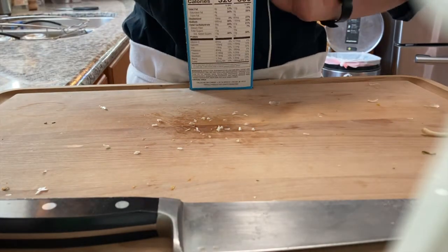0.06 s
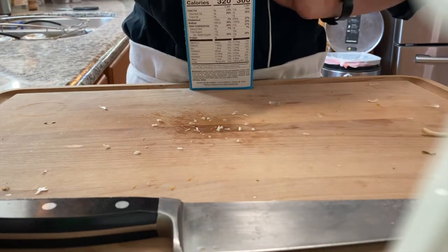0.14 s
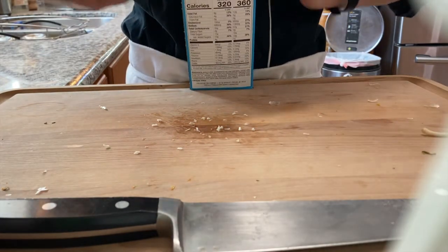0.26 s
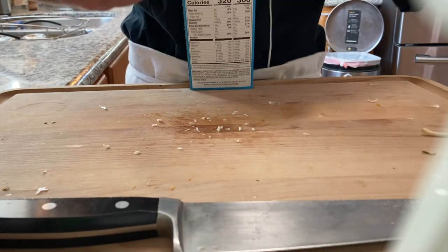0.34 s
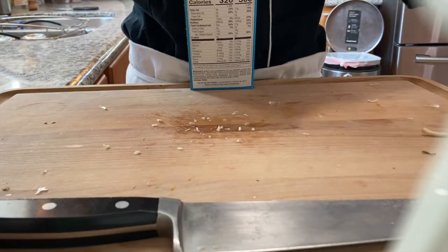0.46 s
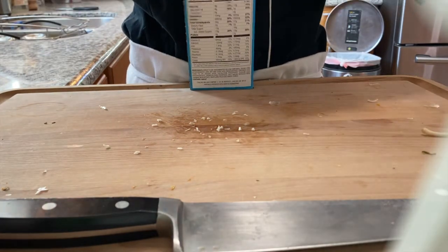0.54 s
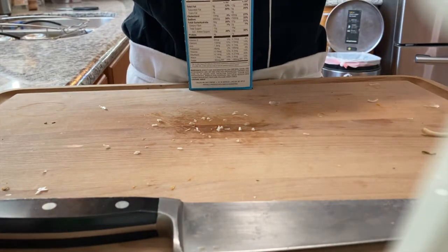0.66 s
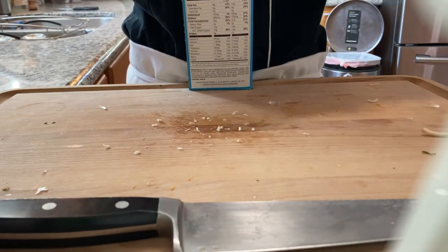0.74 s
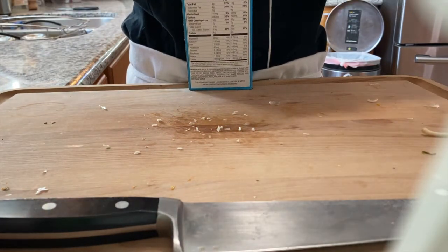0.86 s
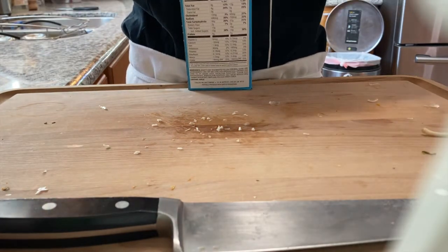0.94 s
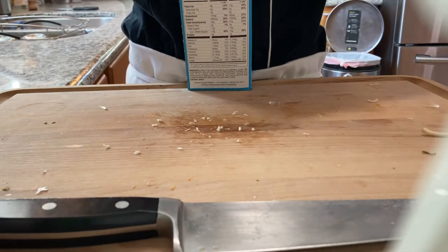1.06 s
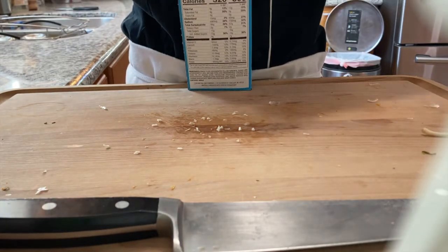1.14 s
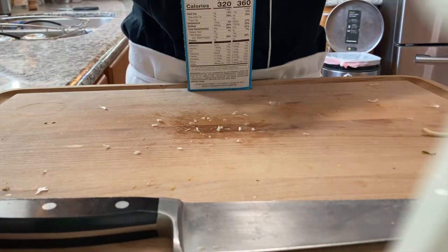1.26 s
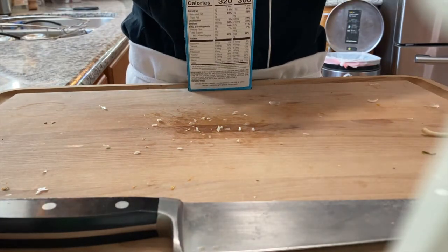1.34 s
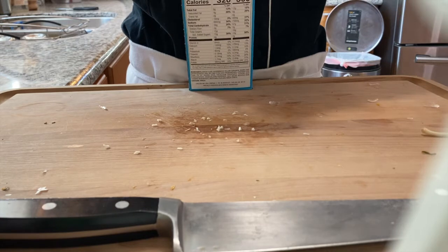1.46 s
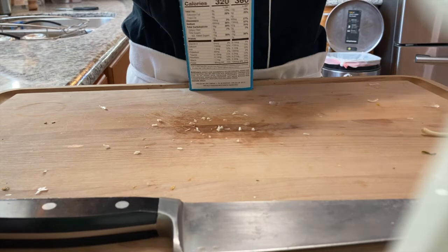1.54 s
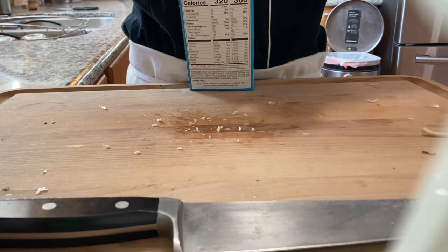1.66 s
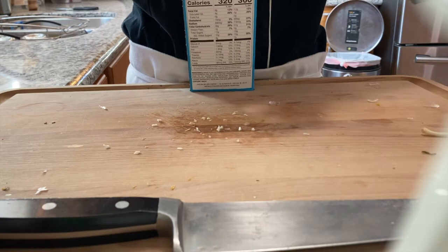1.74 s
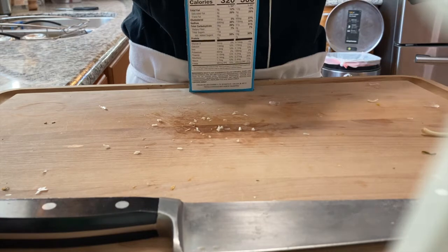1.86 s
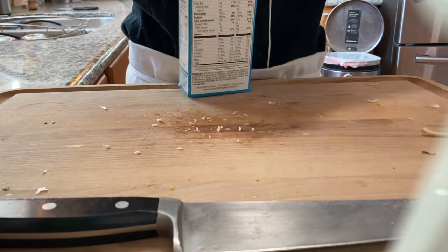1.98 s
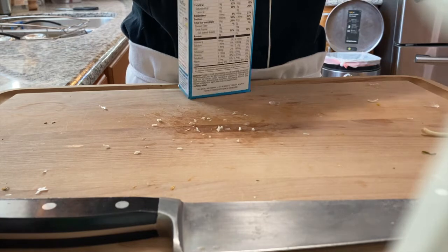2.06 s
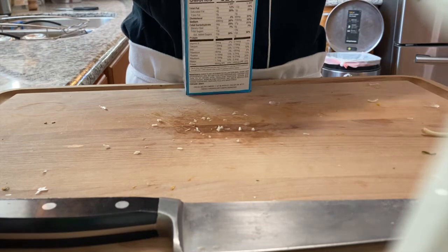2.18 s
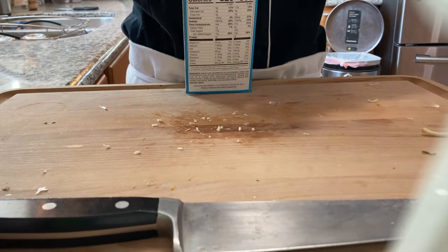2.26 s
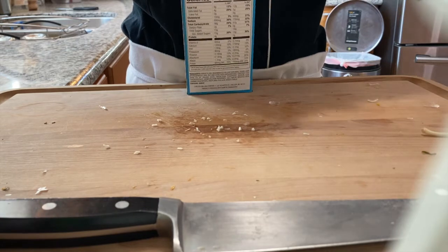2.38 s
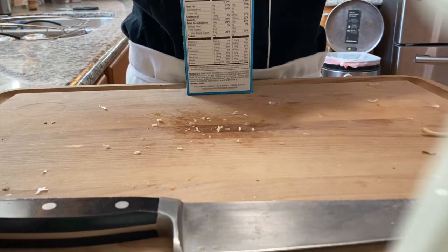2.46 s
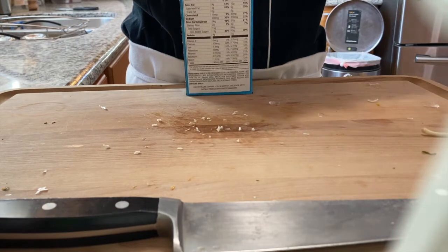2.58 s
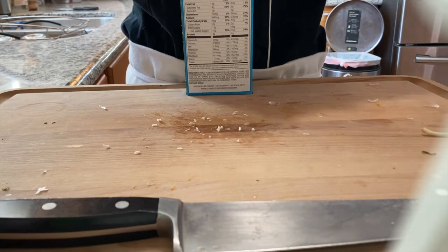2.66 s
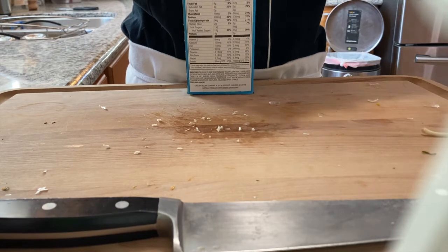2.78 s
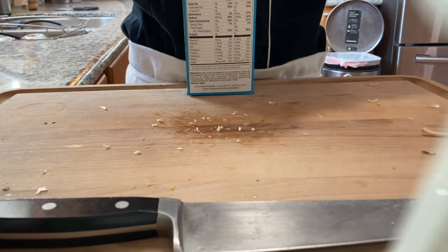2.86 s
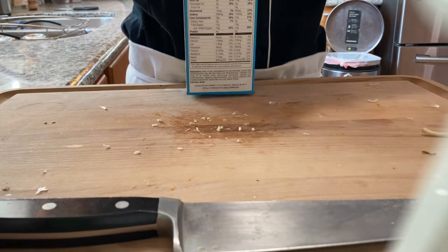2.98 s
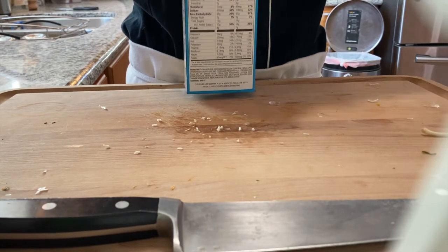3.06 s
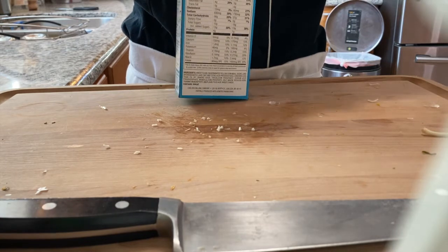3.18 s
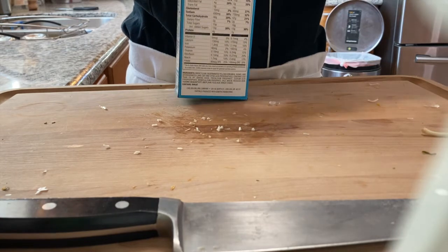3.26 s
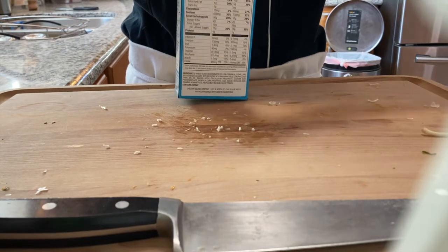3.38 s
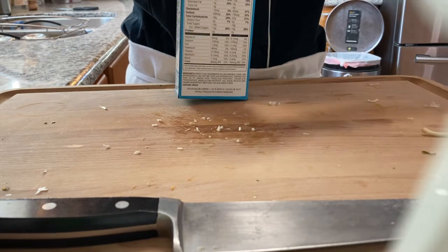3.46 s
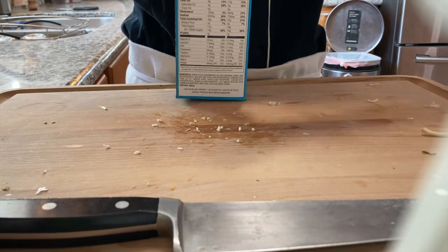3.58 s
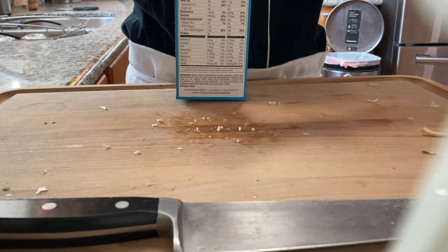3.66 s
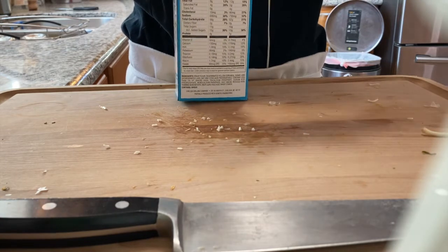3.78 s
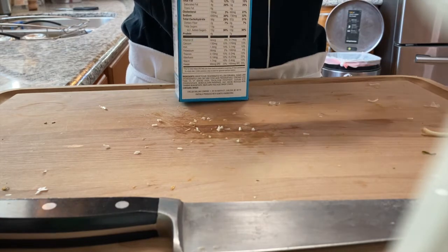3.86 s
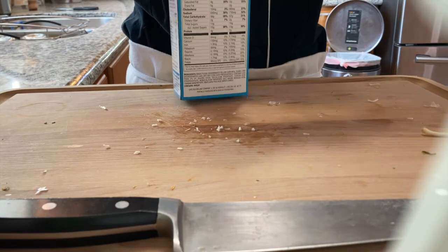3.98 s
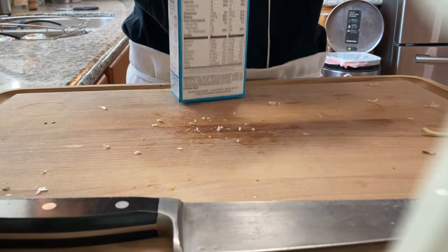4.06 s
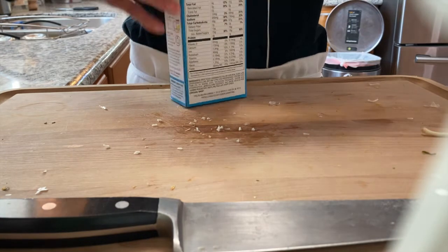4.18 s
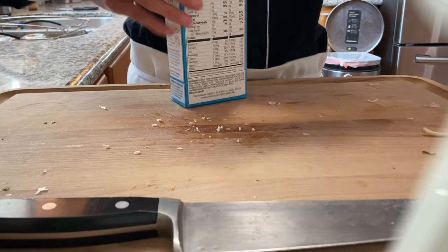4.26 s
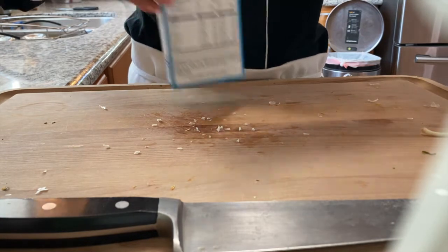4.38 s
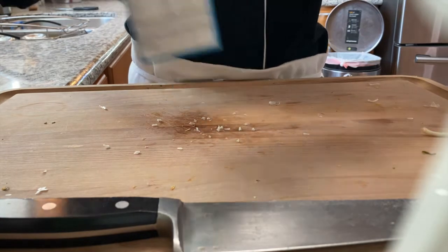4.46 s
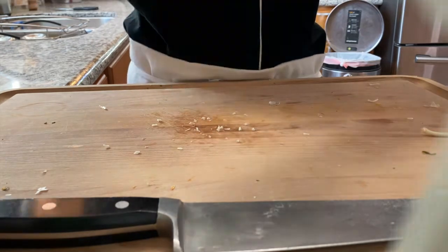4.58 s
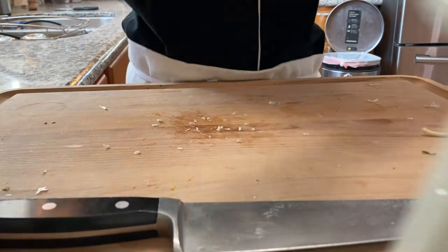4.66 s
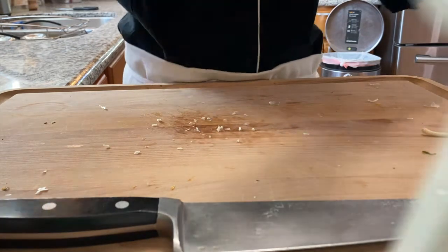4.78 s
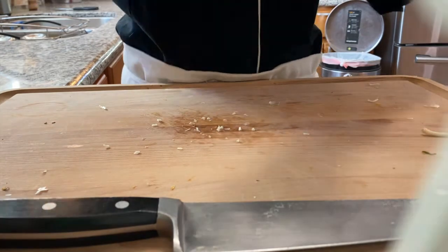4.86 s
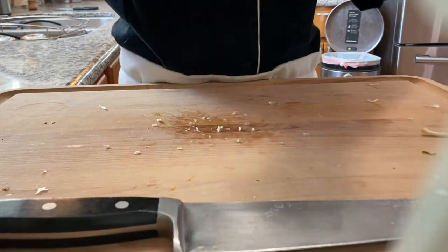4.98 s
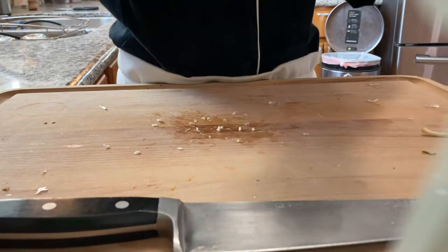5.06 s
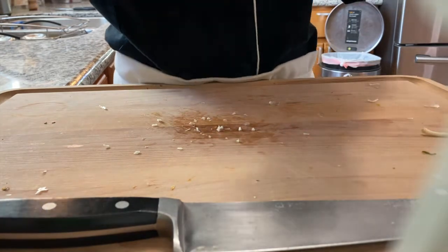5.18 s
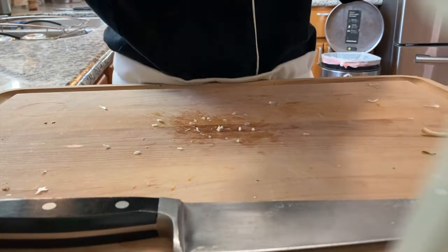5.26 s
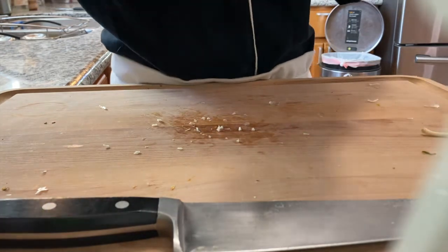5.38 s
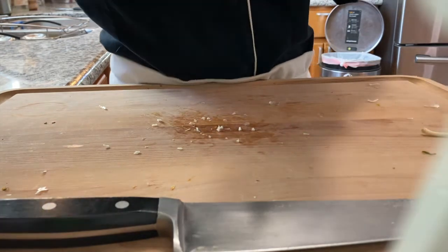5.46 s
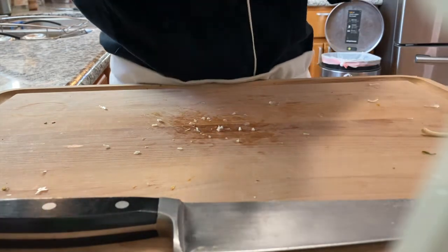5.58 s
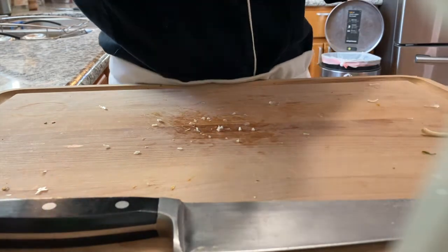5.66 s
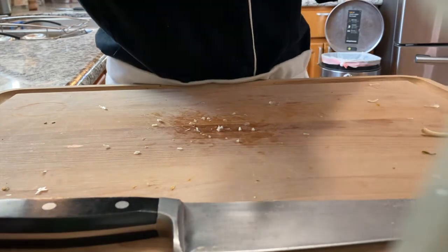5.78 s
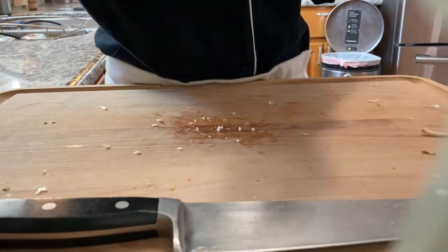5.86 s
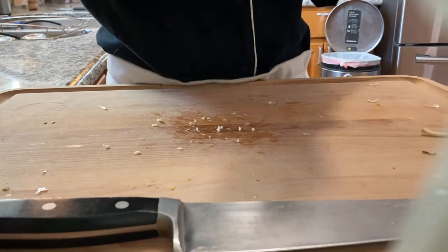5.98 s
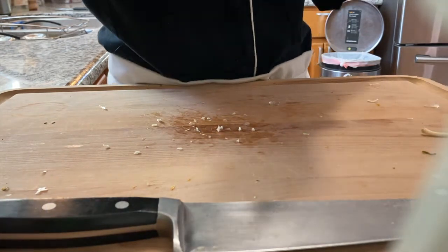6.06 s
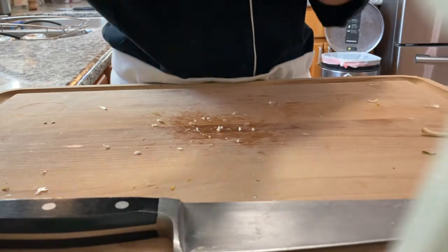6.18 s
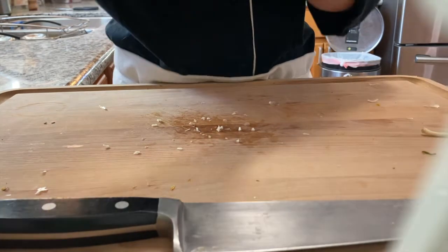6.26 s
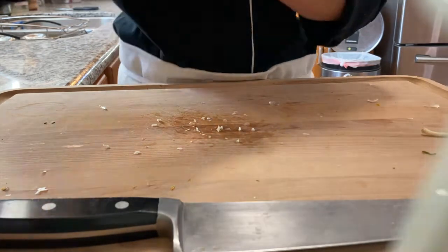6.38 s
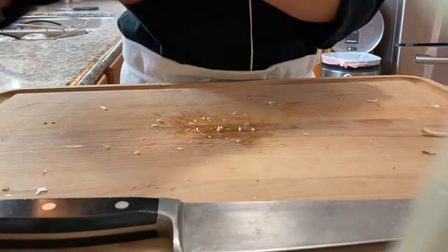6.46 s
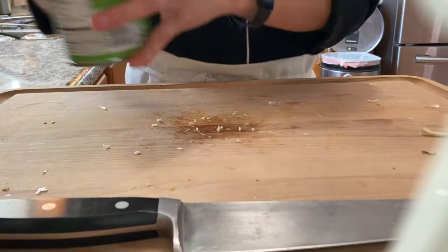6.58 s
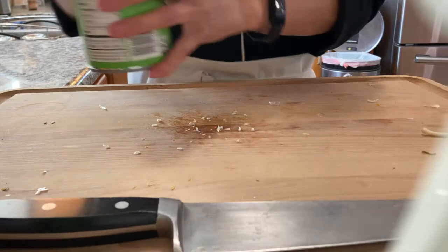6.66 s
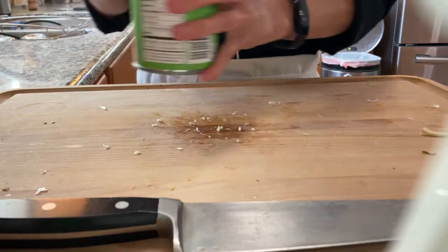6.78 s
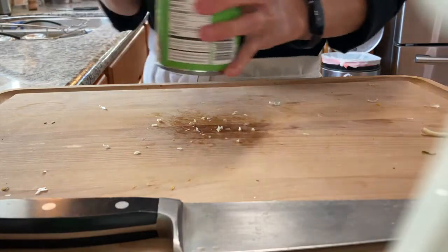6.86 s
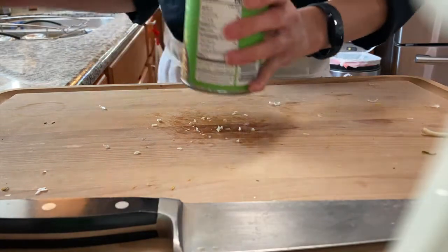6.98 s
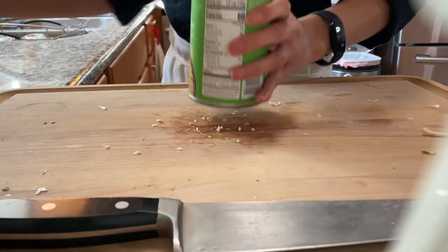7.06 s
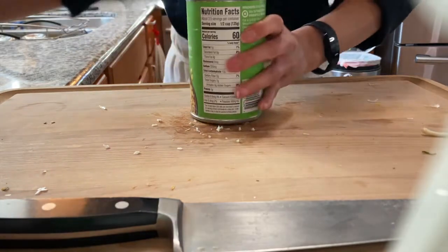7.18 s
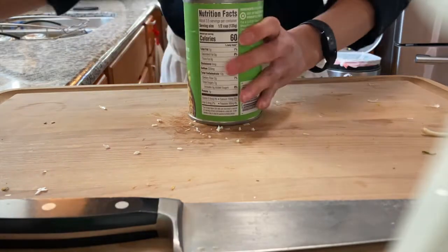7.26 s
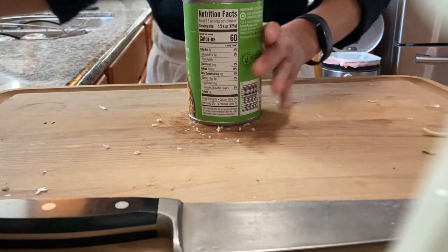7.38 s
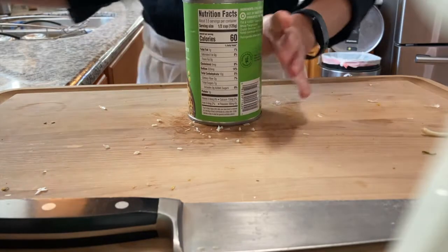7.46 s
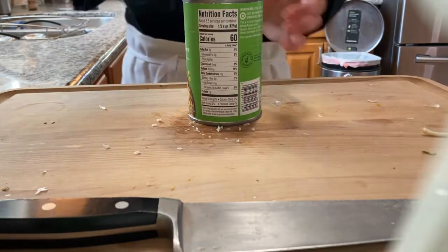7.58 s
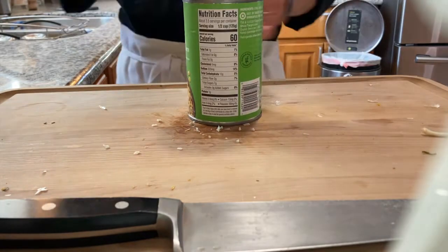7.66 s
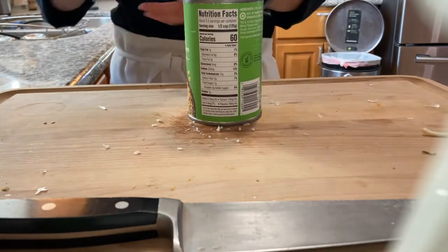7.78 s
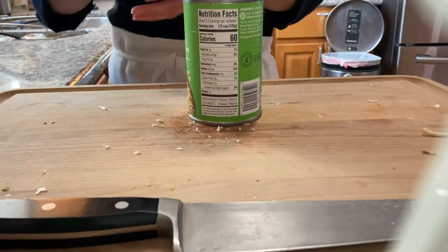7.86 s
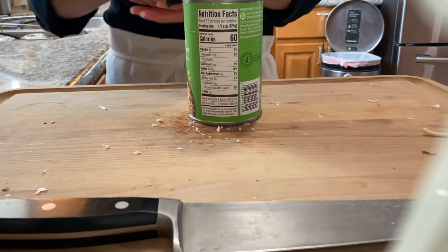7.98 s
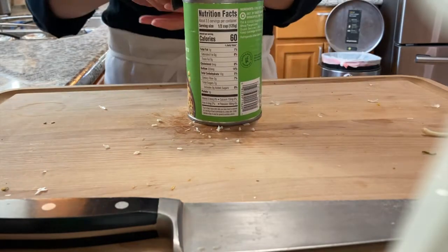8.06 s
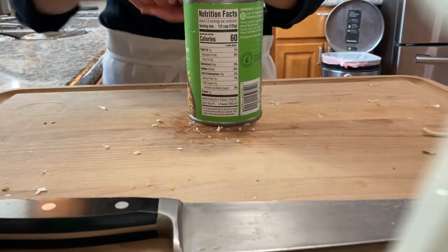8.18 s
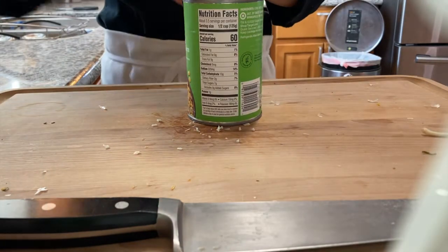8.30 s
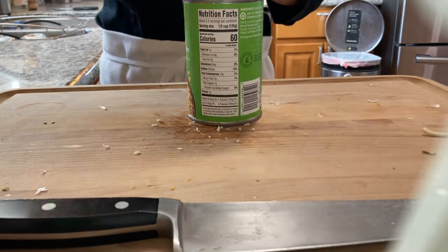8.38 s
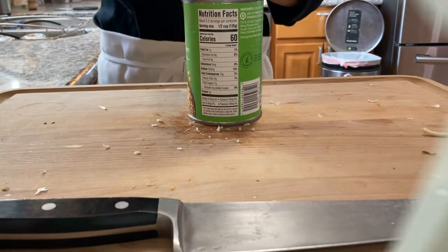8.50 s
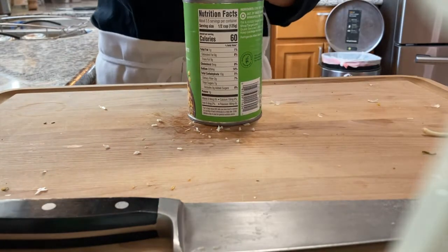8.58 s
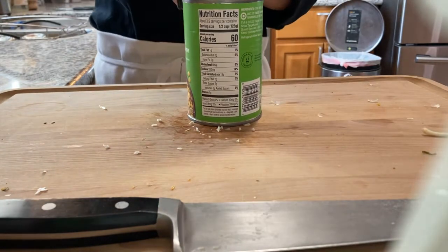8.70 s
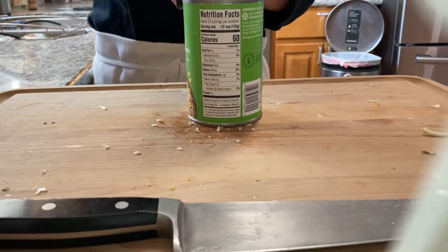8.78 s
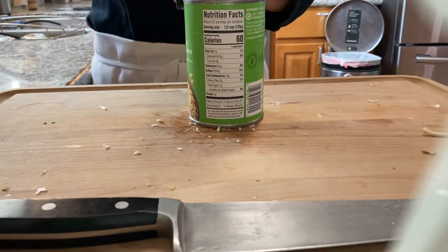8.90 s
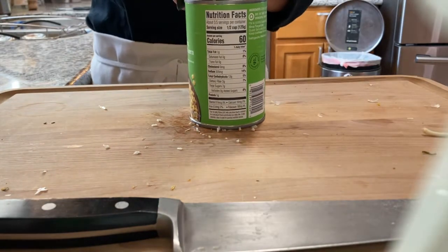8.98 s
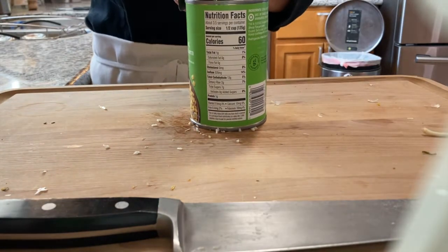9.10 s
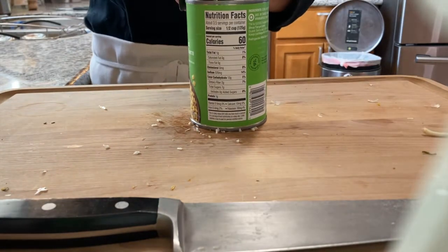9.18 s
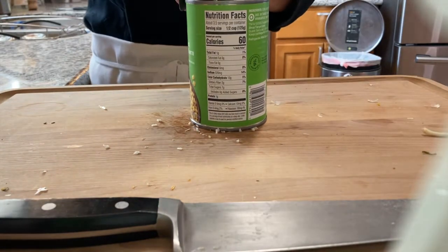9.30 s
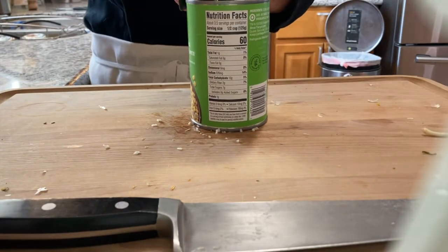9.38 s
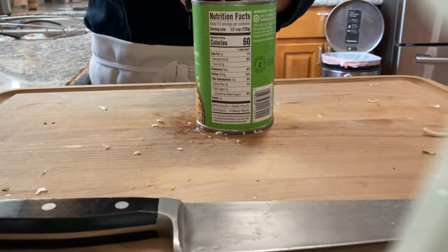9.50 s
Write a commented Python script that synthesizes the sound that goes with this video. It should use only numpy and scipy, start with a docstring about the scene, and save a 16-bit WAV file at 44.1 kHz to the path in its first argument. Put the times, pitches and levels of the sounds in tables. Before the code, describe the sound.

Dry tearing and sharp snapping of a carton, a brief pause, a can set down on wood, then hollow lid pops over low kitchen hum.

```python
"""Cardboard box and lidded canister in a kitchen

A cardboard box is torn open over a wooden cutting board and put aside, its dry contents shifting.
A canister is fetched and set on the board, and its plastic lid is pried off.
Tears and drags are runs of tiny slips; snaps, knocks and pops are bursts of noise coloured by a body.
Low decaying sines are the board, air noise and motor lines the hum, and a diffuse tail the room."""
import sys
import numpy as np
from scipy import signal
from scipy.fft import rfft, irfft, next_fast_len
from scipy.io import wavfile
from scipy.ndimage import uniform_filter1d, map_coordinates

SR = 44100
rng = np.random.default_rng(int(sys.argv[2]) if len(sys.argv) > 2 else 0)


def dump_mix(stems):
    """Bounce the given channels to the path in sys.argv[1] as a 16-bit WAV at rate SR."""
    frames = np.atleast_2d(stems).T  # one column per channel
    limited = np.clip(frames, -1, 1)  # hard clip at full scale
    pcm = np.round(limited * 32767).astype(np.int16)
    wavfile.write(sys.argv[1], SR, pcm)


N = 420273
TIME = np.arange(N) / SR
HIT = np.arange(SR // 3) / SR  # time within one blow [s]

# Broad colour of the cardboard: (frequency [Hz], level [dB])
CARD_COLOUR = [(120, -40), (200, -13), (316, -2.5), (400, -12.5), (520, -4.5), (750, -9.5), (1200, -4),
               (1750, -9.5), (3100, -13), (4500, -11), (6300, -17.5), (9000, -11), (11700, -25.5),
               (15500, -23.5)]
# Resonances of the box's walls: (frequency [Hz], width [Hz], prominence [dB, halved in use])
BOX_PANELS = [(520, 160, -8), (1227, 70, -7), (1505, 49, 9.5), (1860, 13, -5.5), (2340, 40, -9.5),
              (2580, 48, -6), (3126, 320, 5)]
# Containers meet the work top:
# (time [s], level before mixing [dB], bass offset [dB], resonance [Hz])
BASE_KNOCKS = [(7.117, -32.5, -11, 1600), (7.133, -26.5, -7.5, 1200), (7.146, -16, -11, 1230),
               (7.158, -21.5, -4, 1220), (7.177, -23, 2.5, 250), (7.2324, -15, -12, 1103),
               (7.239, -23, 11.5, 290), (7.256, -24.5, 10, 259), (7.263, -27, 6.5, 382)]
# Hollow pops: the box is put aside, the canister is grabbed, its lid comes off:
# (time [s], level before mixing [dB], treble offset [dB], resonance [Hz])
HOLLOW_POPS = [(5.197, -38.5, -38, 610), (5.329, -29.5, -32, 592), (5.776, -36.5, -21, 2950),
               (5.792, -38.5, -42, 536), (5.849, -41, -46, 541), (7.955, -27.5, -13.5, 746),
               (8.008, -11, -16, 532.4), (8.022, -16.5, -23, 1230), (8.054, -15.5, -20, 1120),
               (8.064, -24, -26, 528.6), (8.104, -27.5, -25, 1400), (8.142, -20.5, -13, 519),
               (8.176, -23.5, -17.5, 770), (8.377, -33.5, -33.5, 890), (8.681, -34.5, -15, 1435),
               (8.992, -34.5, -21, 1490)]
# Level of the side signal against the centre, before its share: (frequency [Hz], level [dB])
STEREO_WIDTH = [(60, -27), (170, -18.5), (320, -19), (520, -0.5), (750, 6), (1000, 1.5), (1220, -8.5),
                (1500, -3), (1950, 1.5), (2400, -5), (3000, 0.5), (4200, -0.5), (5800, 4), (8300, -8),
                (14000, 1)]


def amp(db):
    """The decibel law for amplitudes: 20 dB is a factor of ten."""
    return 10 ** (np.asarray(db) / 20)


def unit(x):
    """Power normalisation: each row is brought to rms 1."""
    return x / np.sqrt(np.mean(x ** 2, axis=-1, keepdims=True) + 1e-20)


def along(points, hz):
    """Interpolation of (frequency [Hz], value) points on a logarithmic frequency axis."""
    f, v = np.transpose(points)
    return np.interp(np.log(hz + 1), np.log(f + 1), v)


def wobble(rate):
    """Band-limited randomness: a smooth curve through random knots, rate of them a second."""
    knots = rng.standard_normal(int(N * rate / SR) + 4)
    return map_coordinates(knots, [TIME * rate])


def add(track, s, sound):
    """Superposition: a sound is summed into the track from time s [s]."""
    start = max(0, round(s * SR))
    part = track[:, start:start + sound.shape[-1]]
    part += sound[..., :part.shape[-1]]


def filtered(x, gain):
    """Minimum-phase filtering: the folded cepstrum makes a causal filter of a gain over frequency."""
    n = x.shape[-1]
    m = 2 * next_fast_len(n // 2 + 4096, True)
    magnitude = np.maximum(gain(np.fft.rfftfreq(m, 1 / SR)), 1e-6)
    cepstrum = irfft(np.log(magnitude))
    cepstrum[1:m // 2] *= 2
    cepstrum[m // 2 + 1:] = 0
    response = np.exp(rfft(cepstrum))
    return irfft(rfft(x, m) * response, m)[..., :n]


def shell(spectrum, modes, ring_db):
    """Modal response: the gain of a container is a broad colour with resonances standing out."""
    def gain(f):
        peaks = sum(amp(ring_db + db / 2) / (1 + 2j * (f - hz) / width) for hz, width, db in modes)
        return amp(along(spectrum, f)) * np.abs(1 + peaks)
    return gain


def spot(f, hz, ring_db, sharpness):
    """Local excitation: the touched spot stresses one resonance of its own."""
    return 1 + amp(ring_db) / np.hypot(1, sharpness * (f / hz - hz / (f + 1)))


def registers(x, edges):
    """Band splitting: low- and high-pass filters part a sound at the edges, lowest band first."""
    parts = []
    for hz in edges:
        lowpass = signal.butter(3, hz, "lowpass", fs=SR, output="sos")
        highpass = signal.butter(3, hz, "highpass", fs=SR, output="sos")
        parts.append(signal.sosfilt(lowpass, x))
        x = signal.sosfilt(highpass, x)
    return parts + [x]


def crest(x):
    """Short-time level: the rms of the loudest two milliseconds of the centre signal."""
    return np.sqrt(uniform_filter1d(x[0] ** 2, size=88).max() + 1e-20)


def swell(t, length, rise, fall_t60):
    """Stroke envelope: it builds up, holds for its length, then decays exponentially."""
    fall = amp(-60 * np.maximum(t - length, 0) / fall_t60)
    return fall * (.5 + .5 * np.tanh(t / rise))


def effort_db(t, hardest, build_db_per_s, ease_db_per_s):
    """Force history: the level climbs steadily to the hardest moment of a stroke, then eases."""
    before, after = np.maximum(hardest - t, 0), np.maximum(t - hardest, 0)
    return -build_db_per_s * before - ease_db_per_s * after


def flexing(x, depth_db):
    """Changing boundary conditions: walls bend, so resonances come and go in patches."""
    z = signal.stft(x, nperseg=512)[2]
    field = rng.standard_normal(z.shape[1:])
    for _ in range(2):
        field = uniform_filter1d(field, size=3, axis=0)
        field = uniform_filter1d(field, size=6, axis=1)
    gain = amp(depth_db * field / field.std())
    gain /= np.sqrt(np.mean(gain ** 2))
    return signal.istft(z * gain, nperseg=512)[1][:, :N]


def friction(strokes, body, split_hz, rate, spread_db, clump_db, rise, fall_t60,
             build_db_per_s, ease_db_per_s, ring_db, trim_db, thinning=0, snags_per_s=0):
    """Stick-slip friction: each stroke is a run of tiny uneven slips, in clumps, that excite a body."""
    # a harder stroke is thinner: dB of bass lost per dB above taut_from_db, below taut_hz
    taut_from_db, taut_hz = -48, 645
    snag_db = 13  # how far a snag stands out among the slips
    out, lead = np.zeros((2, N)), .03
    t = np.arange(SR // 2) / SR - lead
    clumps = np.pad(amp(clump_db * wobble(110)), (0, len(t)))
    for start, hardest, end, db, hiss_db, hz in strokes:
        sizes = amp(spread_db * np.minimum(rng.exponential(size=len(t)), 4))
        sizes *= rng.random(len(t)) < rate / SR
        sizes += amp(snag_db) * (rng.random(len(t)) < snags_per_s / SR)
        clumped = sizes * clumps[round(start * SR):][:len(t)]
        slips = clumped * rng.standard_normal((2, len(t)))

        def gain(f):
            taut = amp(-thinning * (db - taut_from_db) / (1 + (f / taut_hz) ** 4))
            return body(f) * taut * spot(f, hz, ring_db, sharpness=7.7)

        low, high = registers(filtered(slips, gain), [split_hz])
        sound = unit(low) * amp(trim_db[0]) + unit(high) * amp(hiss_db + trim_db[1])
        force = amp(db + effort_db(start + t, hardest, build_db_per_s, ease_db_per_s))
        add(out, start - lead, sound * force * swell(t, end - start, rise, fall_t60))
    return flexing(out, depth_db=4.8)


def blows(rows, body, edges_hz, attack, t60s, after_db, strain_db, ring_db, sharpness, trim_db, hold=0):
    """Impact: strain builds for an instant, a crack dies at its own speed in each register,
    and a weak after-rattle follows."""
    out, lead, after_t60 = np.zeros((2, N)), .012, .13
    before = HIT[:len(HIT) // 2]
    t = np.maximum(before - lead, 0)
    strain = amp(strain_db) * (before / lead) ** 2 * (before < lead + attack)
    onset = 1 - np.exp(-t / attack)
    rattle = amp(after_db - 60 * t / after_t60)
    bursts = []
    for t60 in t60s:
        crack = amp(-60 * np.maximum(t - hold, 0) / t60)
        bursts.append(strain + (crack + rattle) * onset)
    bursts = np.array(bursts)
    for s, db, low_db, high_db, hz in rows:
        noise = bursts[:, None] * rng.standard_normal((2, len(t)))
        coloured = filtered(noise, lambda f: body(f) * spot(f, hz, ring_db, sharpness))
        low, middle, high = registers(coloured, edges_hz)
        hit = unit(low[0]) * amp(low_db + trim_db[0])
        hit += unit(middle[1]) * amp(trim_db[1])
        hit += unit(high[2]) * amp(high_db + trim_db[2])
        add(out, s - lead, amp(db) * hit / crest(hit))
    return out


def room_hum():
    """Broadband flow noise and tonal machinery: a low rush of air with unsteady motor lines."""
    # Colour of the air noise: (frequency [Hz], level [dB])
    air_colour = [(25, -21), (45, -14.5), (149, -8.5), (180, -11), (250, -6.5), (400, -17.5), (607, -18.5),
                  (850, -29.5), (1250, -25), (1600, -33), (2500, -34), (4400, -36), (5600, -47),
                  (9320, -46.5), (11600, -61), (15000, -54)]
    # Course of the air noise before a 2 dB lift: (time [s], level [dB])
    air_course = [(4.45, -70.5), (8.42, -64.5), (9.53, -66)]
    # Motor lines before a 2.5 dB lift: (frequency [Hz], rms level [dB])
    motor_lines = [(102.3, -81), (150.7, -79.5), (228, -75.5), (619.1, -86.5), (1244, -90.5)]
    rush = unit(filtered(rng.standard_normal((2, N)), lambda f: amp(along(air_colour, f))))
    rush *= amp(np.interp(TIME, *np.transpose(air_course)) + 2.0)
    for hz, db in motor_lines:
        phase = 2 * np.pi * hz * TIME + 0.48 * wobble(7)
        rush[0] += amp(db + 2.5) * np.sqrt(2) * np.sin(phase)
    return rush


def grip():
    """Creeping contact: fingers on the held box make a faint, dull, uneven rustle."""
    level_db, waver_db, end_s, top_hz = -63, 6.5, 4.3, 2500
    card = shell(CARD_COLOUR, BOX_PANELS, ring_db=-4.0)
    noise = rng.standard_normal((2, N))
    rustle = filtered(noise, lambda f: card(f) / (1 + (f / top_hz) ** 2))
    uneven = unit(rustle * amp(waver_db * wobble(30)))
    return uneven * amp(level_db) * swell(TIME, end_s, rise=0.0023, fall_t60=0.32)


def box():
    """Fracture: fibres rip in a dense, broad crackle; glue spots snap and ring the panels."""
    # Hands pull at the card: (start [s], hardest [s], end [s], level before trims [dB],
    # fibre hiss offset [dB], resonance [Hz])
    hand_pulls = [(.08, 0.118, .19, -52, 7, 1800), (0.271, 0.407, 0.49, -50, 1, 897),
                  (0.546, 0.63, 0.72, -48, 1.5, 1810), (0.642, 0.66, .745, -32, -1, 1302),
                  (0.778, 0.79, .9, -40, 1, 1698), (0.979, 0.99, 1.076, -44.5, -1, 514),
                  (1.106, 1.16, 1.25, -46.5, 4.5, 8500), (1.446, 1.49, 1.565, -51.5, 9, 8170),
                  (1.577, 1.674, 1.74, -43, 2, 958), (1.78, 1.828, 1.94, -40.5, 2, 1052),
                  (1.946, 2, 2.073, -47.5, 4, 494.6), (2.17, 2.193, 2.32, -44, -3.5, 387),
                  (2.281, 2.317, 2.54, -44, -2, 3240), (2.554, 2.634, 2.68, -58.5, 5.5, 3940),
                  (2.72, 2.752, 2.86, -49, 4.5, 6660), (2.933, 2.97, 3.04, -44, 2.5, 1545),
                  (3.022, 3.027, 3.15, -40, 0.5, 1010), (3.286, 3.302, 3.35, -62, 9, 7176),
                  (3.518, 3.55, 3.65, -39.5, -6, 328.5), (3.706, 3.723, 3.81, -41.5, 1, 1400),
                  (3.812, 3.85, 3.9, -33, -0.5, 2200), (3.939, 3.994, 4.08, -37.5, 0.5, 2793),
                  (4.1, 4.114, 4.25, -55, -14.5, 1260), (4.281, 4.33, 4.42, -47.5, -10.5, 421)]
    # Glue spots give way: (time [s], level before mixing [dB], treble offset [dB], resonance [Hz])
    glue_breaks = [(0.003, -25, -23.5, 500), (0.07, -30, -21.5, 404), (0.326, -28.5, -21, 506),
                   (0.381, -30.5, -25, 450), (0.455, -32.5, -22, 3020), (0.644, -19.5, -8, 3374),
                   (0.664, -24, -17.5, 1510), (0.679, -17, -18, 1450), (0.689, -9, -9, 2590),
                   (0.783, -27.5, -12, 1730), (0.823, -28, -11, 934), (0.885, -15.5, -13, 4000),
                   (1.028, -27, -8, 1457), (1.115, -31.5, -3.5, 7500), (1.183, -25, -11, 1250),
                   (1.19, -24, -22, 1450), (1.232, -16.5, -26, 1410), (1.477, -25.5, -6.5, 7800),
                   (1.519, -21, -8, 1480), (1.571, -31, -14.5, 1440), (1.605, -29, -14, 1500),
                   (1.65, -20.5, -15, 960), (1.69, -11, -13.5, 500), (1.73, -23.5, -13.5, 2280),
                   (1.747, -21, -13, 1480), (1.776, -25.5, -17.5, 1520), (1.794, -24.5, -14, 1200),
                   (1.872, -23.5, -17, 1220), (1.913, -18.5, -17.5, 1050), (1.954, -19.5, -23, 1260),
                   (2.023, -25.5, -10.5, 4220), (2.11, -38, -14, 1500), (2.173, -22, -25, 1300),
                   (2.327, -33, -18, 1260), (2.358, -28, -15.5, 1190), (2.467, -39.5, -18.5, 3100),
                   (2.499, -35, -23, 3146), (2.648, -30.5, -10, 4370), (2.69, -17.5, -17, 960),
                   (2.756, -5, -2.5, 7400), (2.93, -34, -21.5, 1480), (2.961, -22, -13, 1520),
                   (3.032, -23, -16.5, 1070), (3.049, -23, -17, 1180), (3.061, -17, -12, 1210),
                   (3.104, -27, -20, 1190), (3.3, -36, -1.5, 7540), (3.403, -35, -15.5, 3160),
                   (3.47, -24, -38, 1230), (3.531, -17, -30.5, 1420), (3.61, -27, -21.5, 1200),
                   (3.647, -15.5, -15, 3000), (3.711, -29, -17.5, 1210), (3.819, -19, -18.5, 1230),
                   (3.835, -4.5, -10.5, 2340), (3.852, -17, -15, 1250), (3.876, -23, -17, 2920),
                   (3.924, -15.5, -11.5, 5400), (3.948, -23, -17.5, 1230), (4.028, -20, -15, 2883),
                   (4.046, -23.5, -13, 1476), (4.326, -20, -22, 2870)]
    # a snap that rings above the knee moves the panels less
    panel_db, knee_hz, panel_db_per_octave = -3.5, 1330, 11.5
    fibres = shell(CARD_COLOUR, BOX_PANELS, ring_db=-3)
    card = shell(CARD_COLOUR, BOX_PANELS, ring_db=2.5)
    # single fibres catch and break among the slips: the snags
    rip = friction(hand_pulls, fibres, 2300, rate=6600, spread_db=1.0, clump_db=3.0,
                   rise=0.010, fall_t60=0.066, build_db_per_s=90, ease_db_per_s=60,
                   ring_db=1, trim_db=[-1.5, -1.2], thinning=0.53, snags_per_s=110)
    breaks = []
    for s, db, treble_db, hz in glue_breaks:
        low_db = panel_db - panel_db_per_octave * max(0, np.log2(hz / knee_hz))
        breaks.append((s, db, low_db, treble_db, hz))
    snaps = blows(breaks, card, [1800, 6000], attack=.0004, t60s=[.036, .021, .009],
                  after_db=-21, strain_db=-25, ring_db=14.0, sharpness=10,
                  trim_db=[0, -7, 4], hold=.001)
    return rip + amp(-10.0) * snaps + grip()


def ticks(t60=0.054, attack=0.00069, ring_db=-4):
    """Impulsive excitation of a resonator: fingers flick edges, each tick with one resonance."""
    # Light finger ticks: (time [s], level before ring_db [dB], resonance [Hz])
    finger_ticks = [(1.348, -46.5, 1020), (4.279, -42, 1480), (4.8351, -60, 2100), (4.9472, -63, 2790),
                    (5.023, -46, 2520), (5.245, -47, 1512), (5.279, -48.5, 1430), (5.847, -44.5, 1456),
                    (5.9856, -65, 2220), (9.066, -58.5, 4600), (9.4605, -42, 9390)]
    out = np.zeros((2, N))
    sharpness, skirt_db = 4, -52
    envelope = amp(-60 * HIT / t60) * (1 - np.exp(-HIT / attack))
    for s, db, hz in finger_ticks:
        touch = rng.standard_normal((2, len(HIT))) * envelope
        tick = filtered(touch, lambda f: amp(skirt_db) + 1 / (1 + (sharpness * (f / hz - hz / (f + 1))) ** 2))
        add(out, s, amp(db + ring_db) * tick / crest(tick))
    return out


def board(cycles=9, attack=0.003, push_db=4):
    """Damped oscillation: the heavy board answers a push with a few low cycles."""
    # Soft blows on board and counter: (time [s], level before push_db [dB], frequency [Hz])
    soft_thumps = [(2.397, -47, 86), (3.146, -37, 87.7), (4.226, -44, 174.6), (5.208, -27, 87.5),
                   (5.803, -32, 157.6), (5.823, -37, 159.5), (7.288, -31.5, 88), (7.328, -25.5, 227),
                   (8.173, -34, 102.6), (9.444, -43.5, 90), (9.49, -43.5, 78.5)]
    # every knock and pop also pushes the board, relative to its own listed level
    board_hz, knock_push_db, pop_push_db = 92, -17, -28.5
    pushes = list(soft_thumps)
    pushes += [(s, db + knock_push_db, board_hz) for s, db, *_ in BASE_KNOCKS]
    pushes += [(s, db + pop_push_db, board_hz) for s, db, *_ in HOLLOW_POPS]
    out = np.zeros((2, N))
    for s, db, hz in pushes:
        decay = amp(-60 * HIT * hz / cycles)  # 60 dB down after the given cycles
        swing = np.sin(2 * np.pi * hz * HIT) * decay * (1 - np.exp(-HIT / attack))
        add(out[:1], s, amp(db + push_db) * swing)
    return out


def ringing(hits, modes, attack=.001):
    """Free vibration: each hit leaves the canister ringing; its loose contents blur every mode."""
    blur_hz = 12  # line width given by the random phase drift
    out = np.zeros((2, N))
    for s, db in hits:
        for hz, mode_db, t60 in modes:
            steps = rng.standard_normal((2, len(HIT)))
            drift = np.cumsum(steps, axis=1) * np.sqrt(2 * np.pi * blur_hz / SR)
            tone = np.sin(2 * np.pi * (hz * HIT + rng.random((2, 1))) + drift)
            add(out, s, tone * amp(db + mode_db - 60 * HIT / t60) * (1 - np.exp(-HIT / attack)))
    return out


def containers():
    """Impact and granular friction: a container lands edge first, rocks flat, and its contents slide."""
    # Broad colour of the container's base: (frequency [Hz], level [dB])
    base_colour = [(59, -35), (100, 0.5), (171, -10), (332, -7), (500, -9.5), (700, -18), (1200, 1),
                   (1530, -8), (1810, -14.5), (4220, -20), (8350, -21), (11600, -37), (14000, -63)]
    # Resonances of the base: (frequency [Hz], width [Hz], prominence [dB, halved in use])
    base_modes = [(222, 26, -8), (1850, 77, -3.5), (1940, 22.5, -14)]
    # Broad colour of the dry contents: (frequency [Hz], level [dB])
    crumb_colour = [(120, -39), (200, -4), (380, -14), (600, -3), (800, -14.5), (1560, -19.5),
                    (2750, -20.5), (4800, -28.5), (9580, -37), (11500, -58), (14900, -45.5), (16000, -64)]
    # Resonances under the contents: (frequency [Hz], width [Hz], prominence [dB, halved in use])
    crumb_modes = [(215, 87, -11.5), (1260, 73, -8), (2280, 300, 3)]
    # Dry contents shift: (start [s], fullest [s], end [s], level before trims [dB],
    # crumb hiss offset [dB], resonance [Hz]); an end ahead of its start leaves only the fading part
    content_slides = [(5.18, 5.195, 5.205, -51, -9, 650), (5.307, 5.336, 5.37, -41.5, -10, 599),
                      (5.355, 5.375, 5.26, -54.5, -8, 2300), (7.132, 7.154, 7.23, -34.5, -15, 1210),
                      (7.28, 7.317, 7.35, -36, -2, 4200), (7.37, 7.42, 7.43, -50, -4.5, 2700)]
    # The metal bottom rings on: (frequency [Hz], level re the crumb hiss [dB], t60 [s])
    bottom_ring = [(829, -11.5, .35), (2293, -13, .5), (2660, -12, 0.43), (2875, -11, 0.32)]
    treble_db = -34.5
    base = shell(base_colour, base_modes, ring_db=-1.0)
    landings = [(s, db, low_db, treble_db, hz) for s, db, low_db, hz in BASE_KNOCKS]
    knocks = blows(landings, base, [700, 2500], attack=0.00076, t60s=[.045, .018, .03],
                   after_db=-26, strain_db=-24, ring_db=17.5, sharpness=4.1, trim_db=[0, -5, 0])
    loose = shell(crumb_colour, crumb_modes, ring_db=0.5)
    crumbs = friction(content_slides, loose, 2700, rate=6600, spread_db=0.5, clump_db=1.0,
                      rise=0.0035, fall_t60=0.21, build_db_per_s=160, ease_db_per_s=125.5,
                      ring_db=-8.0, trim_db=[-1, -1])
    hits = [(fullest, db + hiss_db) for _, fullest, _, db, hiss_db, _ in content_slides]
    return amp(-5.0) * knocks + crumbs + ringing(hits, bottom_ring)


def sleeve():
    """Friction noise of a soft surface: cloth brushes past with a fine hiss as the arms move."""
    # Sleeves brush past: (start [s], end [s], level [dB])
    brushes = [(5.185, 5.37, -68.5), (6.575, 6.726, -63), (6.758, 6.859, -72), (7.821, 7.963, -70.5),
               (8.78, 8.897, -77)]
    # Colour of the cloth: (frequency [Hz], level [dB])
    cloth_colour = [(500, -19), (3000, -15), (7000, -11.5), (10000, 1), (15000, -1.5)]
    hiss = filtered(rng.standard_normal((2, N)), lambda f: amp(along(cloth_colour, f)))
    strokes = sum(amp(db) * swell(TIME - start, end - start, rise=0.014, fall_t60=0.15)
                  for start, end, db in brushes)
    return unit(hiss * amp(2.5 * wobble(57))) * strokes


def lid():
    """Cavity resonance: hollow pops from handling and the lid coming off; the lid drags; modes ring on."""
    # Broad colour of the hollow body: (frequency [Hz], level [dB])
    hollow_colour = [(76, -46), (130, -12.5), (312, -6), (403, -1.5), (446, -5), (522, -0.5), (577, -1),
                     (1050, -12.5), (2270, -22.5), (2610, -24), (11100, -40), (15000, -47.5)]
    # Resonances of the hollow body: (frequency [Hz], width [Hz], prominence [dB, halved in use])
    hollow_modes = [(536, 22, -3), (787, 22, 1), (1034, 35, 7), (1270, 39, 2), (1485, 100, -1),
                    (1594, 46, -13)]
    # The lid drags on the rim and in the hand: (start [s], hardest [s], end [s],
    # level before trims [dB], scuff offset [dB], resonance [Hz])
    lid_rubs = [(7.96, 8.005, 8.08, -37.5, -11, 1210), (8.1, 8.165, 8.2, -33.5, -9, 1390),
                (8.2, 8.23, 8.33, -46, -10.5, 780), (8.425, 8.445, 8.5, -44, -12, 1245),
                (8.684, 8.69, 8.73, -50.5, -10.5, 1450), (9, 9.005, 9.03, -50.5, -7, 1437),
                (9.39, 9.47, 9.53, -65.5, -4, 5450)]
    # Every pop rings on: (frequency [Hz], level re the pop's listed level [dB], t60 [s])
    hollow_ring = [(517, -21.5, .16), (755, -25, .31), (1017, -24.5, 0.17), (1230, -29, 0.18),
                   (1452, -21, .1), (1755, -36.5, 0.41), (2540, -41.5, 0.24)]
    # the duller the contact, the more it sounds the hollow (dB per dB)
    hollow_db, hollow_per_treble = -15, 0.35
    hollow = shell(hollow_colour, hollow_modes, ring_db=-1.5)
    contacts = [(s, db, hollow_db - hollow_per_treble * treble_db, treble_db, hz)
                for s, db, treble_db, hz in HOLLOW_POPS]
    pops = blows(contacts, hollow, [700, 2500], attack=.0005, t60s=[.048, .028, .026],
                 after_db=-23, strain_db=-15.5, ring_db=6.0, sharpness=8, trim_db=[3, -3, 0])
    drag = friction(lid_rubs, hollow, 2400, rate=4500, spread_db=0.5, clump_db=.5,
                    rise=0.0085, fall_t60=0.053, build_db_per_s=70.5, ease_db_per_s=128.0,
                    ring_db=-4, trim_db=[-2, -2])
    ring = ringing([(s, db) for s, db, *_ in HOLLOW_POPS], hollow_ring)
    return amp(-7.5) * pops + drag + ring


def squeak(s=9.21, hz=5200, db=-68, t60=0.12, waver=0.0042):
    """Frequency modulation: a fingertip's one thin, faint squeak is a sine of wavering pitch."""
    pitch = hz * (1 + waver * wobble(300))
    tone = np.sin(2 * np.pi * np.cumsum(pitch) / SR)
    return amp(db) * tone * swell(TIME - s, 0.011, rise=.002, fall_t60=t60)


def kitchen(x):
    """Reverberation: a diffuse tail of noise, each frequency dying at its own speed."""
    # Decay of the room: (frequency [Hz], t60 [s])
    room_t60 = [(100, 0.43), (500, 0.23), (3000, 0.31), (8000, 0.15), (15000, 0.24)]
    hz, t, z = signal.stft(rng.standard_normal((2, SR // 2)), SR, nperseg=256)
    decay = amp(-60 * t / along(room_t60, hz)[:, None]) * (1 - np.exp(-t / 0.00097))
    tail = signal.istft(z * decay, SR, nperseg=256)[1]
    return signal.fftconvolve(x[:1], tail / np.linalg.norm(tail[0]), axes=1)[:, :N]


def out_of_step(x):
    """Interchannel phase: the side signal of one sound that reaches two microphones out of step."""
    # Lead of the left microphone, before the sine and tanh: (frequency [Hz], phase [rad])
    left_lead = [(330, 0), (520, -0.5), (760, -2), (1000, -4.5), (1220, -6.5), (1500, -8), (1950, -4),
                 (2500, -6), (2900, -8.5), (3600, -10.5), (5000, -10.5), (6000, -10.5), (8300, -7),
                 (10000, -5.5), (15000, -4.5)]
    m = next_fast_len(N + SR // 4, True)
    f = np.fft.rfftfreq(m, 1 / SR)
    turn = np.tanh(4 * np.sin(along(left_lead, f)))
    return irfft(rfft(x, m) * 1j * turn * amp(along(STEREO_WIDTH, f)), m)[:N]


def scene():
    """Centre and side superposition: bass is nearly alike in both ears and leans left."""
    # Lean of the image: (frequency [Hz], left minus right [dB])
    left_lean = [(100, 3), (220, 2.5), (370, 7), (700, 0.5), (1300, -2), (2500, -1), (6000, 0)]
    out_of_step_share, diffuse_share = 0.7, 0.85
    carton = box()
    canister = containers() + lid() + board()
    small = ticks() + sleeve() + squeak()
    sent = amp(-11.5) * carton + amp(-8.0) * canister + amp(-14.5) * small
    centre, side = carton + canister + small + kitchen(sent) + room_hum()
    diffuse = filtered(side, lambda f: amp(along(STEREO_WIDTH, f)))
    side = diffuse_share * diffuse + out_of_step_share * out_of_step(centre)
    left = filtered(centre + side, lambda f: amp(along(left_lean, f) / 2))
    right = filtered(centre - side, lambda f: amp(-along(left_lean, f) / 2))
    return np.array([left, right])


def record(dry, notch_hz=12200, notch_width_hz=800, notch_db=-11, bottom_hz=54, top_hz=16500):
    """Band limits: the deepest bass is rolled off, the treble dips near 12 kHz and ends at 16.5 kHz."""
    highpass = signal.butter(3, bottom_hz, "highpass", fs=SR, output="sos")
    dry = signal.sosfilt(highpass, dry)
    m = next_fast_len(N + SR // 4)
    f = np.fft.rfftfreq(m, 1 / SR)
    colour = amp(notch_db * np.exp(-((f - notch_hz) / notch_width_hz) ** 2))
    return irfft(rfft(dry, m) * colour * (f < top_hz), m)[:, :N]


dry = scene()
out = record(dry)
dump_mix(out)
```